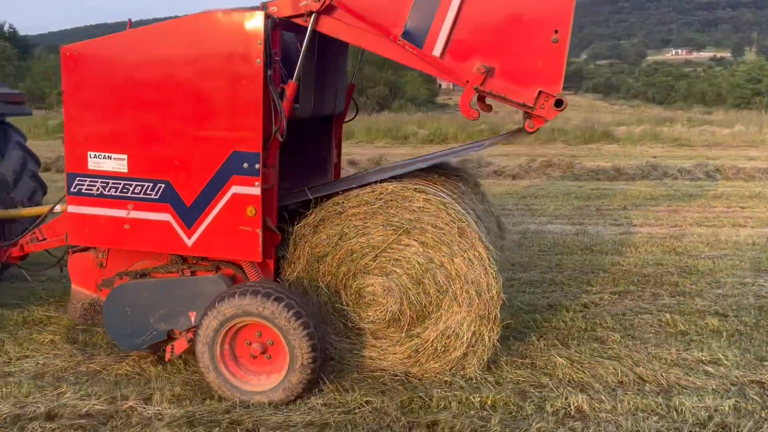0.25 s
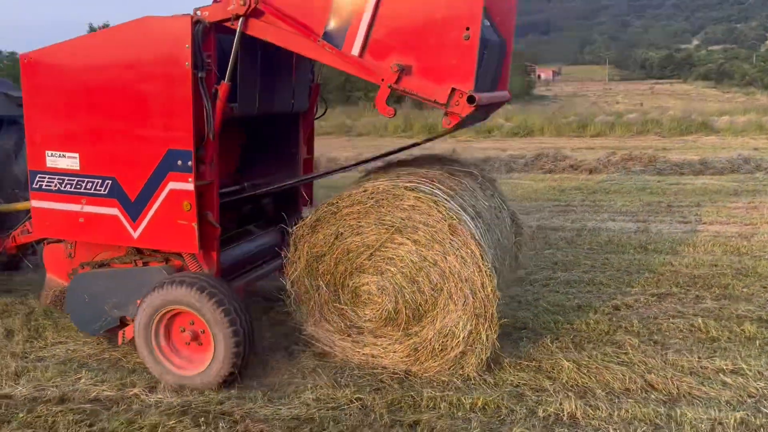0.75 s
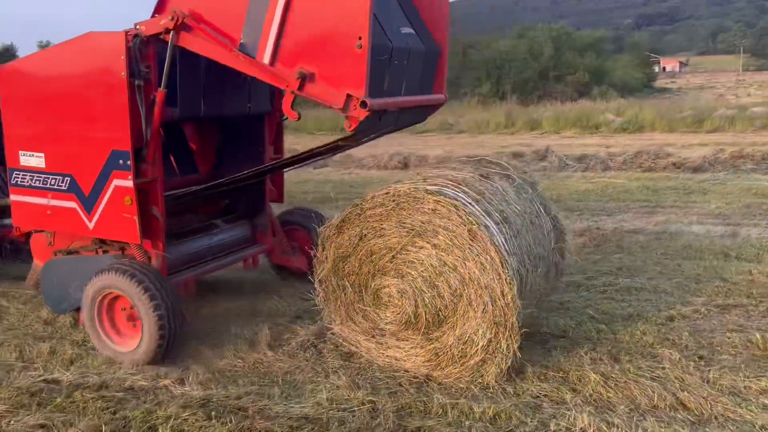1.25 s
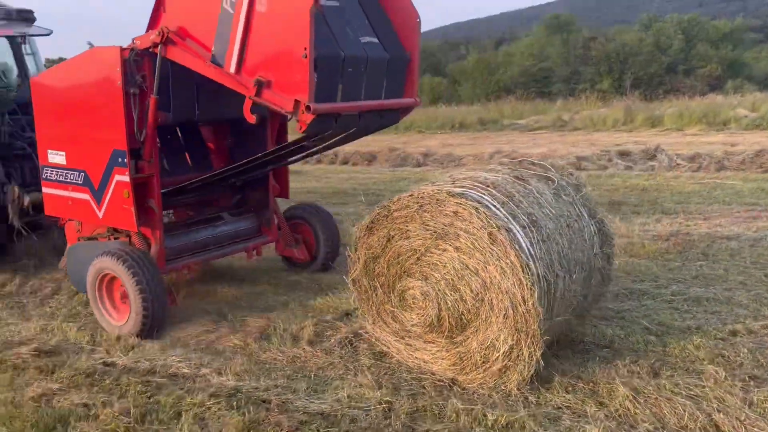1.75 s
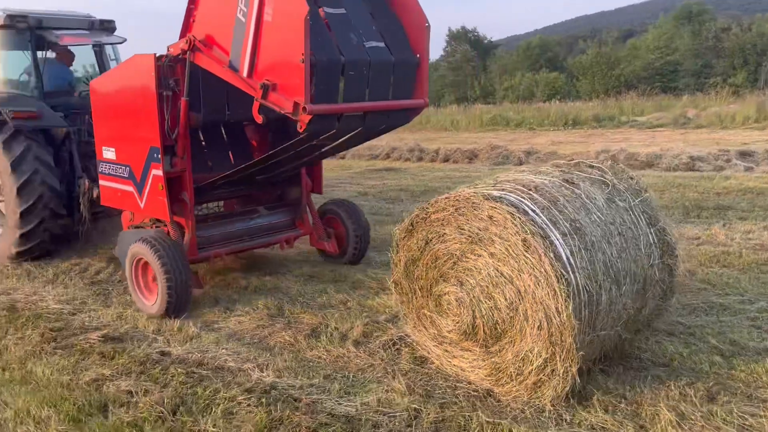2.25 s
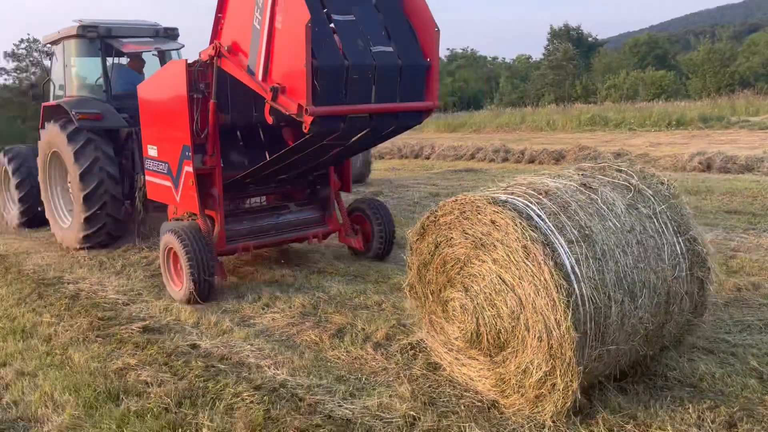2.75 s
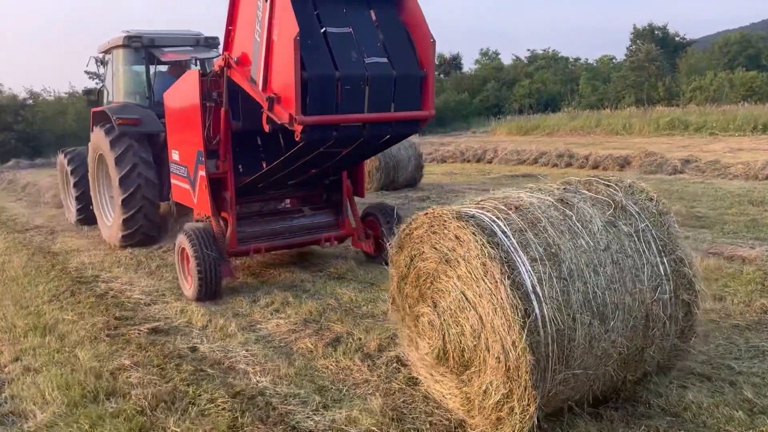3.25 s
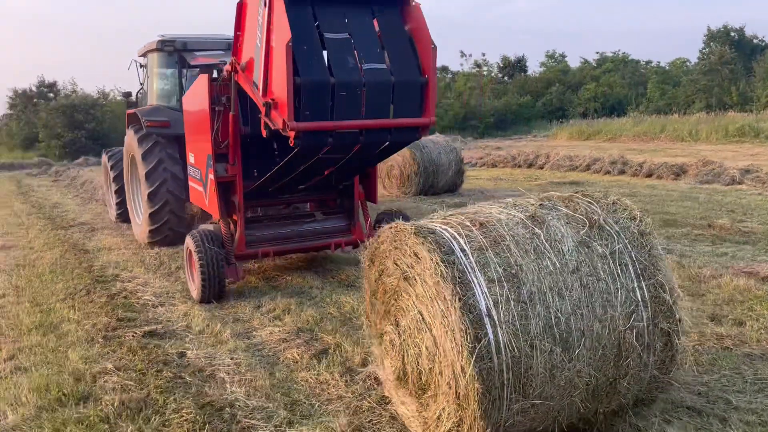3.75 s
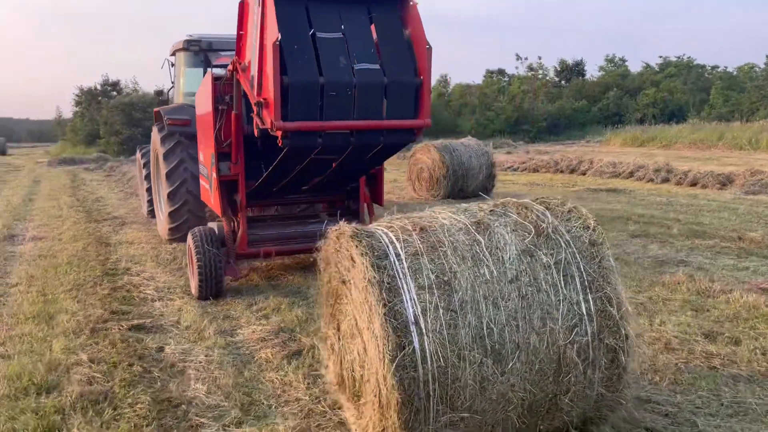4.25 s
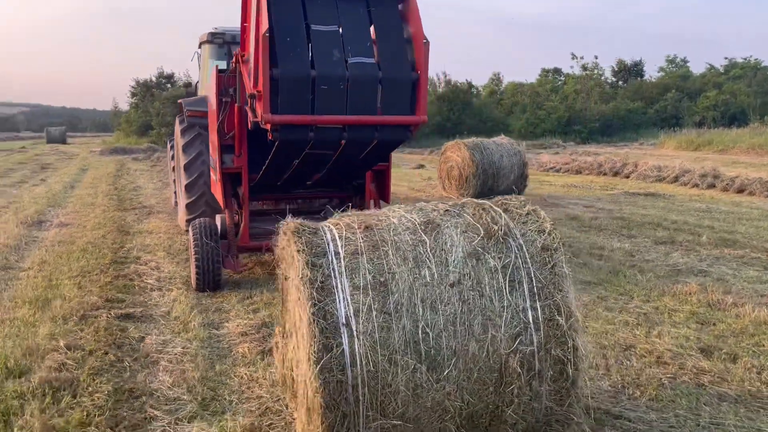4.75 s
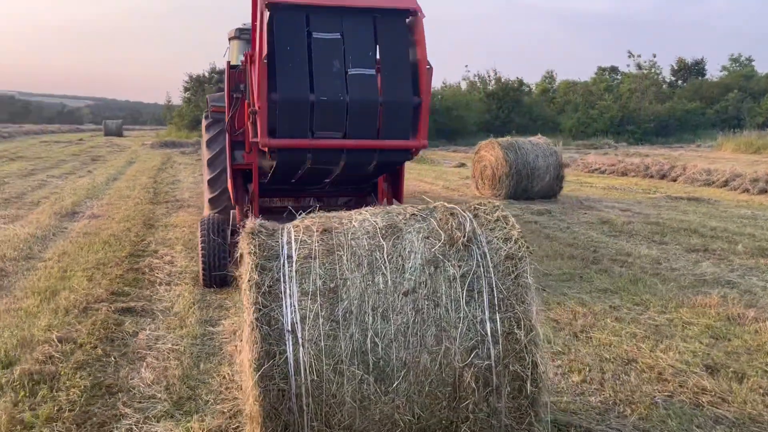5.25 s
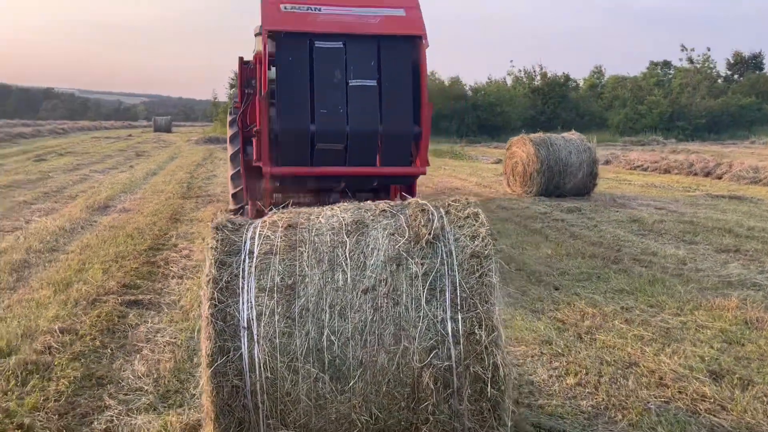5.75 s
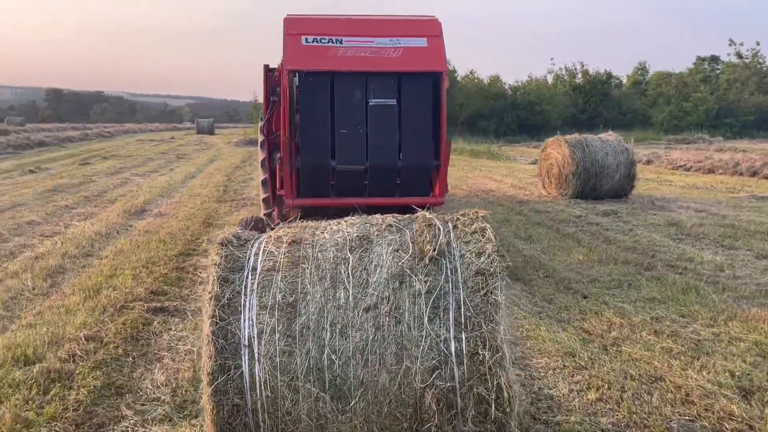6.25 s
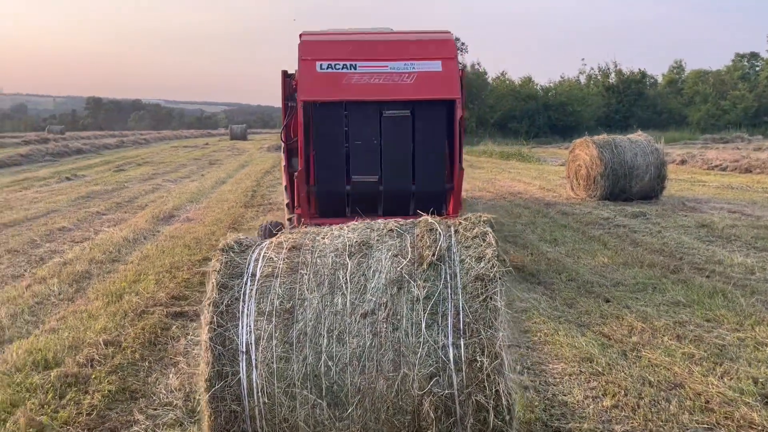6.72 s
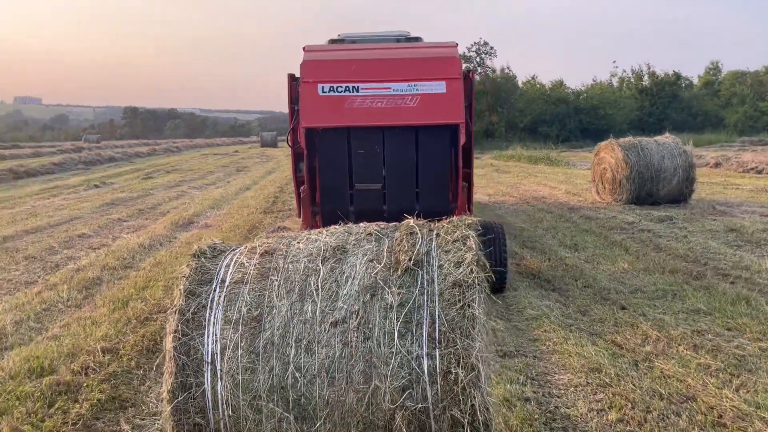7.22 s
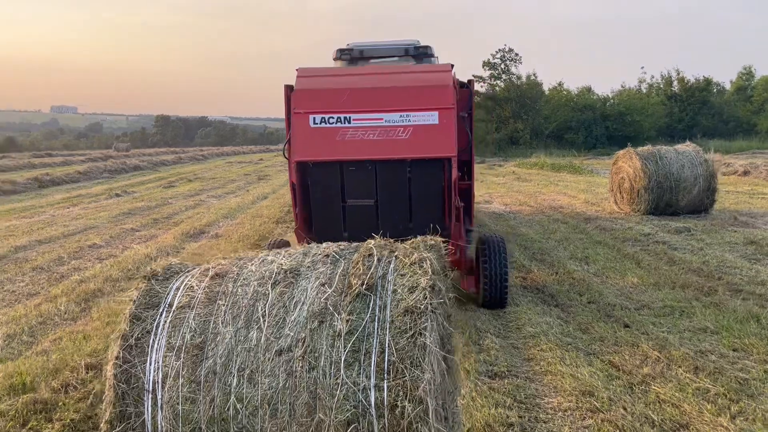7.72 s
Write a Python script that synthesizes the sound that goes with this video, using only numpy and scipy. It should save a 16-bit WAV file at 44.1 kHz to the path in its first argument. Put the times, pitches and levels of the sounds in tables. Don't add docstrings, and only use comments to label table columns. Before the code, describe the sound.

In an open mown field, a close diesel tractor and round baler rattle loudly. The engine sags under load, barking, then recovers within about a second and settles to an even hum. Pump and gear whine continue as the machine gets quieter. A dry bearing chirps repeatedly, a hinge squeals briefly, and dull steel knocks sound far off. Faint crickets appear late, while wind buffets the handheld stereo phone.

```python
import sys
import numpy as np
from scipy import signal
from scipy.fft import rfft, irfft, next_fast_len
from scipy.io import wavfile
from scipy.ndimage import uniform_filter1d, map_coordinates

SR = 44100
rng = np.random.default_rng(int(sys.argv[2]) if len(sys.argv) > 2 else 0)


def store_wav(level_fs):
    pcm = np.round(np.clip(np.atleast_2d(level_fs), -1, 1) * 32767)
    wavfile.write(sys.argv[1], SR, pcm.T.astype(np.int16))


def linear_from_db(decibels):
    return 10 ** (np.asarray(decibels, float) / 20)


N = 351907

# time_s, tooth_rate_hz
SPEED = [(0, 409.6), (.15, 413), (.26, 402.4), (.49, 357.6), (.62, 339.4), (.8, 334.4), (1.0, 361),
         (1.13, 400), (1.24, 408.4), (1.5, 417.8), (2.0, 415.1), (7.98, 415.9)]
GOVERNED_HZ, BOGGED_HZ = 416, 334
FIRING, FAN = .197, .4925
# time_s, level_db
AWAY = [(0, 0.5), (.5, 0.5), (.95, 0), (1.5, -3), (2.2, -6), (2.9, -7), (3.4, -6.5), (4.8, -8),
        (5.25, -9.5), (5.6, -12), (6.5, -12), (7.2, -13), (7.98, -11)]

# middle_s, half_length_s, level_db
FIRING_LOBES = [(.1, .2, -39.5), (.45, .14, -34), (.68, .14, -32.5), (.88, 0.087, -31.5), (1.2, 0.13, -35),
                (4.3, 2.6, -50)]
# middle_s, half_length_s, level_db
DOUBLE_LOBES = [(.05, 0.21, -31), (.5, 0.2, -37), (.9, 0.23, -40.5), (3.2, 0.22, -49), (6.2, 0.52, -37.5),
                (7.9, 0.21, -28.5)]
FIRING_DB, LUG_DB = -42.5, 6.5
BARK_DB, BARK_SLOPE_DB, BARK_SCATTER_DB = -53, 3, 5
# middle_s, half_length_s, level_db
FAN_LOBES = [(0, 0.32, -35), (1.8, 0.71, -37), (4.1, 1.41, -36), (5.85, 0.65, -33.5), (7.3, 1.38, -32.5)]
# middle_s, half_length_s, level_db
FAN_THIRD_LOBES = [(.6, 1.4, -49), (2.05, 0.32, -56.5), (4.1, 1.4, -55.5), (5.3, 0.97, -55),
                   (7, 1.6, -57.5)]
# middle_s, half_length_s, level_db
PUMP_LOBES = [
    [(0, 0.21, -51), (1.75, 0.74, -45), (3.4, 1.14, -43), (4.8, 0.26, -57.5), (6.4, 0.81, -49),
     (7.5, 0.8, -49.5)],
    [(.12, 0.42, -41), (1.02, 0.087, -46), (1.6, 0.36, -55.5), (2.7, .8, -47.5), (3.85, 0.65, -46),
     (4.95, 0.43, -49.5), (6.8, 0.28, -58), (7.6, 0.17, -56)],
    [(.38, 0.19, -39.5), (1.04, 0.29, -42.5), (1.63, 0.23, -42.5), (2.9, 0.72, -54), (4.2, 0.43, -52),
     (6.3, 1.74, -55)],
    [(.5, 0.17, -41), (1.02, .15, -43), (2.1, 0.47, -47.5), (2.92, 0.12, -49.5), (3.6, 0.28, -50.5),
     (4.05, .2, -50)],
]
PUMP_SHAKE_DB, PUMP_DRIFT = 1, .015
# multiple_of_tooth_rate, level_db
GEARS = [(.6235, -47), (.6575, -49), (.6885, -56)]
# time_s, level_db
GEARS_IN = [(0, -24), (3.5, -10.5), (4.8, 2), (6.5, 5.5), (7.5, -1.5), (7.98, 10.5)]
GEAR_SHAKE_DB, GEAR_DRIFT = 1.5, .04
# multiple_of_tooth_rate, level_db
MESH = [(2.355, -0.5), (2.912, 3), (3.146, 6.5), (3.34, 0.5)]
# multiple_of_tooth_rate, then swells of middle_s, half_length_s, level_db
MESH_LOBES = [
    (2.56, [(.07, 0.11, -42.5), (.27, .05, -42), (1.9, 0.75, -50.5), (6.5, 4.3, -62)]),
    (3.828, [(.28, 0.13, -40.5), (.58, 0.067, -36.5), (.78, 0.02498, -38), (1.95, 0.17, -52), (3, 0.7, -61), (6.8, 1, -61.5)]),
    (4.998, [(.7, 0.19, -45), (1.45, 0.18, -64), (2.15, 0.15, -58.5), (3.6, 0.21, -71), (6.8, 0.99, -68.5)]),
]

# frequency_hz, level_db
BODY = [(120, -35.5), (200, 3), (350, -0.5), (600, -3.5), (1000, -0.5), (1650, -3), (1800, -15),
        (2300, -23.5), (5000, -120)]
# frequency_hz, level_db
RATTLE = [(500, -120), (1400, -32), (1800, 5.5), (2200, -1.5), (2600, -1.5), (3100, -4), (3600, -4),
          (4700, -3), (5200, -5.5), (6000, -22), (12000, -120)]
# frequency_hz, level_db
HISS = [(1500, -120), (4400, -16), (5150, .5), (6400, -1.5), (7200, -1), (8500, .5), (10000, -3.5),
        (11300, -3), (12000, -13)]
# pitch_hz, width_hz, level_db
PANELS = [(2440, 59, 6), (3060, 270, 3.5), (4460, 31, 7.5), (5550, 92, 4), (5410, 770, -5.5),
          (1763, 99, -8.5), (3550, 340, -1.5)]
BODY_DB, RATTLE_DB, HISS_DB = -35.5, -45.5, -51.5
BASS_HZ, BASS_STAYS = 680, 0.46
RATTLE_FADES, HISS_FADES, WHINE_FADES = 1.276, 1.106, 0.83
SHADE_S, SHADE_HALF_S, SHADE_DB = 3.86, 2.7, -5
# pitch_hz, near_level_db, flare_middle_s, flare_half_length_s, flare_level_db
WHINES = [(2426, -64, 2, .3, -68), (3053, -67, 3.3, .9, -70), (4928, -69, 3.6, .25, -69),
          (5817, -79, 3.15, .6, -75), (4538, -70, 3.9, .5, -74), (3741, -72, 2.5, .4, -75),
          (2455, -99, 7.9, .16, -65)]

# peak_s, level_db
CHIRPS = [ (3.669, -63), (3.755, -58), (3.848, -45), (3.96, -52), (4.064, -57), (4.18, -49), (4.278, -51),
          (4.382, -48), (4.485, -46.5), (4.585, -45.5), (4.693, -45), (4.793, -45.5), (4.906, -52),
          (5.014, -51), (5.117, -52), (5.222, -48), (5.326, -47), (5.44, -48), (5.56, -50), (5.678, -56),
          (5.785, -56)]
# middle_s, half_length_s, level_db
DRAG = [
    (3.72, .14, -61),
    (4.6, .4, -72),
    (5.4, .45, -71),
]
CHIRP_HZ, FALL_HZ, RISE_S, CHIRP_S = 2428, 22, .015, .015
# start_s, length_s, level_db
SQUEAL = [
    (5.142, 0.062, -46.5),
    (5.195, 0.058, -46),
    (5.243, .04, -53),
    (5.288, 0.04, -48),
    (5.318, .035, -51.5),
    (5.36, 0.045, -59),
]
# middle_s, half_length_s, level_db
OVERTONES = [
    [(5.157, .012, -63), (5.186, 0.015, -53), (5.24, .04, -67), (5.322, 0.01, -56), (5.345, .015, -61),
     (5.39, 0.025, -64)],
    [(5.19, 0.03, -69), (5.25, .016, -63)],
]
SQUEAL_HZ, SAG_HZ_PER_S, SLIP_EDGE_S = 1921, 500, 0.012
# start_s, peak_db
CLANK = [
    (5.9124, -42),
    (6.85, -51),
    (7.187, -43),
]
# frequency_hz, level_db
CLANK_COLOUR = [(300, -22), (1200, 8.0), (4400, -11.5), (12000, -21)]

# start_s, level_db
CRICKET = [
    (6.29, -64),
    (6.975, -61),
    (7.13, -66),
    (7.317, -58),
    (7.652, -57),
    (7.8, -64),
]
STROKES_DB = [-7, -3.5, -.5, .5]
# time_s, level_db
WIND = [(0, -49), (.35, -40.5), (1.7, -36), (2.6, -37), (3.6, -30), (4.4, -32.5), (5.1, -31), (5.9, -34.5),
        (6.8, -29.5), (7.55, -24.5), (7.77, -27), (7.82, -32), (7.98, -37)]
# middle_s, half_length_s, low_thump_db, high_thump_db
GUSTS = [(0, 0.023, -47, -42), (0.477, 0.029, -49, -35.5), (1.35, 0.031, -44, -41), (2.31, 0.029, -29, -49),
         (2.41, 0.046, -33, -42), (2.55, 0.029, -30, -41), (3.41, 0.02, -30, -31), (3.72, 0.11, -29.5, -47),
         (5.047, 0.021, -26, -30), (5.36, 0.038, -32, -45), (5.81, .03, -32, -40), (6.653, 0.033, -32, -34),
         (6.86, 0.047, -27, -37), (7.197, .03, -31, -30), (7.55, 0.052, -36, -32),
         (1.851, 0.073, -30.5, -47), (2.093, 0.039, -30, -28), (2.2, 0.053, -32, -36),
         (2.671, 0.034, -31, -28.5), (2.812, 0.071, -35, -31.5), (2.947, 0.08, -26, -30.5),
         (3.088, 0.043, -26.5, -31), (3.127, 0.029, -23, -30), (3.201, 0.025, -23, -29),
         (3.378, 0.048, -33, -30.5), (3.889, 0.048, -22.5, -35), (4.269, 0.029, -31, -26),
         (4.447, 0.14, -30.5, -44), (4.581, 0.044, -25, -45), (4.709, 0.03, -22, -23.5),
         (4.863, 0.093, -28, -33), (5.277, 0.023, -23, -49), (5.56, 0.13, -26.5, -35),
         (5.724, 0.023, -23, -40), (5.937, 0.08, -24, -45), (6.131, 0.06, -26, -34.5),
         (6.269, 0.03, -20.5, -27.5), (6.342, 0.0051, -20, -19.5), (6.427, 0.039, -20, -25),
         (6.531, 0.042, -23, -32), (7.025, 0.055, -29.5, -27.5), (7.293, 0.061, -19.5, -23.5),
         (7.428, 0.012, -15, -21.5), (7.731, 0.059, -25.5, -21)]
# frequency_hz, level_db
GUST_LOW = [(12, -58.5), (28, 14.5), (45, 18.5), (70, 29.5), (100, 26.5), (130, 19), (190, -29), (400, -58),
            (1000, -120)]
# frequency_hz, level_db
GUST_HIGH = [(40, -74.5), (85, -21.5), (125, 2), (160, 1.5), (220, -7), (300, -13.5), (420, -27.5),
             (600, -35.5), (1000, -67.5), (3000, -120)]
HIGH_OVER_LOW_DB = -2.5

# frequency_hz, phase_radians
LEAD = [(100, 0), (450, .55), (700, 1.2), (1000, 2.1), (1400, 2.8), (1650, 3), (1750, 1.6), (1950, .8),
        (2250, 0), (2900, 1.3), (3400, .3), (4600, 1.1), (5400, .1), (6300, 0), (7400, -3.14),
        (9700, -3.14), (10500, -6.28)]
# frequency_hz, phase_radians
LEAD_AHEAD = [(100, 0), (450, -.4), (750, 0), (1300, 0), (1600, .6), (1800, 0), (2600, .2), (3200, .5),
              (4000, .2), (4800, .3), (5700, -.8), (6400, -.6), (7300, -3.14), (9700, -3.14),
              (10400, -6.28)]
# frequency_hz, level_db
TILT = [(300, .3), (950, 1.5), (1150, 1), (1500, -6.5), (1650, -4), (1830, 5), (2000, 4), (2300, .5),
        (3050, 5), (3900, 3.5), (4850, 5.5), (5400, 1), (6700, -.5), (7500, 0)]
# frequency_hz, likeness_0_to_1
ALIKE = [(100, .9), (450, .97), (800, .85), (1500, .85), (1780, .5), (1950, .4), (2250, .94), (3000, .65),
         (4900, .55), (5500, .88), (6400, .95), (7000, .5), (7450, .9), (8000, .996), (9100, .996),
         (9650, .9), (10000, .5), (10450, .9), (11000, .998)]
# frequency_hz, likeness_0_to_1
ALIKE_AHEAD = [(100, .82), (450, .93), (1800, .9), (2250, .85), (3000, .6), (4900, .5), (5500, .6),
               (6400, .75), (7000, .5), (7450, .9), (8000, .99), (9100, .99), (10000, .5), (11000, .98)]
# time_s, share_ahead_0_to_1
TURN = [(0, 0.068), (1.5, 0.26), (4, 0.57), (5.5, 0.6), (7.98, 0.8)]
TOP_HZ = 11930


def unit(x):
    return x / np.sqrt(np.mean(x ** 2) + 1e-20)


def along(points, hz):
    f, v = np.transpose(points)
    return np.interp(np.log(hz + 1), np.log(f + 1), v)


def curves(rows):
    s, *cols = np.transpose(rows)
    return [np.interp(np.arange(N) / SR, s, c) for c in cols]


def lobes(rows):
    s = np.arange(0, N + 64, 64) / SR
    power = np.zeros(len(s))
    for middle, half, db in rows:
        far = ((s - middle) / half) ** 2
        power += linear_from_db(db) ** 2 * np.exp(-far * (1 + far))
    return np.interp(np.arange(N) / SR, s, 10 * np.log10(power + 1e-12))


def wobble(rate):
    s = np.arange(0, N + 128, 64)
    knots = map_coordinates(rng.standard_normal(int(N * rate / SR) + 4), [s * rate / SR])
    between = np.diff(knots)[:, None] * (np.arange(64) / 64)
    return (knots[:-1, None] + between).ravel()[:N]


def filtered(x, response):
    m = next_fast_len(N + 8192)
    return irfft(rfft(x, m) * response(np.fft.rfftfreq(m, 1 / SR)), m)[..., :N]


def rush(gain_db, patchy_db, gate=1):
    z = signal.stft(rng.standard_normal((2, N)), nperseg=512)[2]
    field = uniform_filter1d(rng.standard_normal(z.shape[1:]), 6, 0)
    field = unit(uniform_filter1d(field, 12, 1))
    pair = gate * signal.istft(z * linear_from_db(patchy_db * field), nperseg=512)[1][:, :N]
    return unit(filtered(pair, lambda hz: linear_from_db(gain_db(hz))))


def tone(turns, db, shake_db, drift):
    cycle = ((turns + drift * wobble(6)) % 1).astype(np.float32)
    level = linear_from_db((db + shake_db * wobble(9)).astype(np.float32))
    return np.sqrt(2) * level * np.sin(np.float32(2 * np.pi) * cycle)


def engine():
    tooth_hz = curves(SPEED)[0]
    load = np.clip((GOVERNED_HZ - tooth_hz) / (GOVERNED_HZ - BOGGED_HZ), 0, 1)
    return np.cumsum(tooth_hz) / SR, load


def firing_tones(teeth, load):
    out = tone(FIRING * teeth, lobes(FIRING_LOBES), PUMP_SHAKE_DB, PUMP_DRIFT)
    out += tone(2 * FIRING * teeth, lobes(DOUBLE_LOBES), shake_db=2.5, drift=0.017)
    load_db = FIRING_DB + LUG_DB * load + curves(AWAY)[0]
    for k in range(3, 7):
        out += tone(k * FIRING * teeth, 2 * load_db + 17.0 - 2.1 * k, shake_db=4.5, drift=0.03)
    return out


def bark(teeth, load):
    n = 2 * SR
    firings = FIRING * teeth[:n] + .01 * wobble(50)[:n]
    ladder = np.zeros(n)
    for k in range(7, 19):
        db = BARK_DB - BARK_SLOPE_DB * k + BARK_SCATTER_DB * wobble(4.4)[:n]
        ladder += linear_from_db(db) * np.sin(2 * np.pi * (k * firings + rng.random()))
    return np.pad(np.sqrt(load[:n]) * ladder, (0, N - n))


def fan_tones(teeth):
    out = tone(FAN * teeth, lobes(FAN_LOBES), shake_db=0.5, drift=0.074)
    return out + tone(3 * FAN * teeth, lobes(FAN_THIRD_LOBES), shake_db=2.0, drift=0.025)


def pump_and_gears(teeth, load):
    slap = .12 * np.sqrt(load) * wobble(70)
    gears_in_db, away_db = curves(GEARS_IN)[0], curves(AWAY)[0]
    out = np.zeros(N)
    for k, rows in enumerate(PUMP_LOBES):
        turns = (k + 1) * teeth + k / 3 * slap
        out += tone(turns, lobes(rows), PUMP_SHAKE_DB, PUMP_DRIFT * (k + 1))
    for order, db in GEARS:
        out += tone(order * teeth, db + gears_in_db, GEAR_SHAKE_DB, GEAR_DRIFT)
    for order, rows in MESH_LOBES:
        out += tone(order * teeth + slap, lobes(rows), shake_db=1.5, drift=0.12)
    for order, db in MESH:
        out += tone(order * teeth, db - 59.0 + 0.81 * away_db, shake_db=2.5, drift=0.26)
    return out


def machinery(teeth):
    s, away_db = np.arange(N) / SR, curves(AWAY)[0]
    firings = FIRING * teeth
    strength = linear_from_db(rng.normal(0, 7.2, int(firings[-1]) + 1))
    knock = strength[firings.astype(int)] * np.exp(-4 * (firings % 1))

    def panels(hz):
        return sum(db / (1 + (2 * (hz - c) / w) ** 2) for c, w, db in PANELS)

    body = rush(lambda hz: along(BODY, hz), patchy_db=1.0, gate=1 + 0.16 * knock)
    rattle = rush(lambda hz: along(RATTLE, hz) + panels(hz), patchy_db=1.1, gate=1 + 0.15 * knock)
    hiss = rush(lambda hz: along(HISS, hz) + panels(hz), patchy_db=2.0, gate=1 + 0.28 * knock)
    shade = linear_from_db(SHADE_DB * np.exp(-((s - SHADE_S) / SHADE_HALF_S) ** 2))
    hiss = hiss + (shade - 1) * filtered(hiss, lambda hz: hz > 8500)
    bass = filtered(body, lambda hz: 1 / (1 + (hz / BASS_HZ) ** 4))
    body = body + (linear_from_db(-BASS_STAYS * away_db) - 1) * bass
    shake_db = 0.18 * wobble(18)
    out = linear_from_db(BODY_DB + away_db) * body
    out += linear_from_db(RATTLE_DB + RATTLE_FADES * away_db + shake_db) * rattle
    return out + linear_from_db(HISS_DB + HISS_FADES * away_db + 5.2 * shake_db) * hiss


def whines():
    s, away_db = np.arange(N) / SR, WHINE_FADES * curves(AWAY)[0]
    out = np.zeros(N)
    for hz, near_db, *flare in WHINES:
        db = np.maximum(near_db + away_db, lobes([flare]))
        out += tone(hz * s + .09 * wobble(150), db, shake_db=2.5, drift=.25)
    return out


def bearing():
    out, t = np.zeros(N), np.arange(-SR // 30, SR // 12) / SR
    shape = np.exp(-(t / np.where(t < 0, RISE_S, CHIRP_S)) ** 2)
    for (s, db), off in zip(CHIRPS, rng.standard_normal(len(CHIRPS))):
        hz = CHIRP_HZ + 12 * off - FALL_HZ * np.tanh(t / CHIRP_S)
        ring = np.sin(2 * np.pi * np.cumsum(hz) / SR)
        out[round((s + t[0]) * SR):][:len(t)] += linear_from_db(db) * shape * ring
    steady = np.sin(2 * np.pi * (CHIRP_HZ - FALL_HZ / 2) * np.arange(N) / SR)
    drag = np.sqrt(2) * linear_from_db(lobes(DRAG)) * steady
    return (out + drag) * linear_from_db(1.1 * wobble(82))


def hinge():
    s = np.arange(N) / SR
    hz = SQUEAL_HZ - SAG_HZ_PER_S * np.clip(s - 5.335, 0, .1)
    turns = np.cumsum(hz) / SR + 0.06 * wobble(64)
    slips = np.zeros(N)
    for start, length, db in SQUEAL:
        to_edge = np.minimum(s - start, start + length - s)
        slips += np.clip(to_edge / SLIP_EDGE_S, 0, 1) * linear_from_db(db)
    out = slips * linear_from_db(1.3 * wobble(60)) * np.sin(2 * np.pi * turns)
    for harmonic, rows in enumerate(OVERTONES, 2):
        out += linear_from_db(lobes(rows) + 2.6 * wobble(80)) * np.sin(2 * np.pi * harmonic * turns)
    return np.sqrt(2) * out


def clanks():
    out, t = np.zeros(N), np.arange(SR // 10) / SR
    for s, db in CLANK:
        fade = linear_from_db(db + 3.0 - 60 * t / 0.14) * (1 - np.exp(-t / .002))
        ring = rng.standard_normal(len(t)) + 1.4 * np.sin(2 * np.pi * 600 * t)
        out[round(s * SR):][:len(t)] += fade * ring
    return filtered(out, lambda hz: linear_from_db(along(CLANK_COLOUR, hz)))


def crickets():
    out, t = np.zeros(N + SR), np.arange(SR // 45) / SR
    hz = 5000 - 550 * (t / t[-1]) ** 2
    stroke = np.sin(np.pi * t / t[-1]) * np.sin(2 * np.pi * np.cumsum(hz) / SR)
    for s, db in CRICKET:
        for k, grow_db in enumerate(STROKES_DB):
            out[round((s + .03 * k) * SR):][:len(t)] += linear_from_db(db + grow_db) * stroke
    return out[:N]


def wind():
    breeze = linear_from_db(curves(WIND)[0])
    low_thumps = linear_from_db(lobes([(s, half, db) for s, half, db, _ in GUSTS]))
    high_thumps = linear_from_db(lobes([(s, half, db) for s, half, _, db in GUSTS]))

    def even(x):
        return x / np.sqrt(1.0 + np.abs(uniform_filter1d(x[0] ** 2, size=2200)))

    low = unit(even(rush(lambda hz: along(GUST_LOW, hz), patchy_db=0.5)))
    high = unit(even(rush(lambda hz: along(GUST_HIGH, hz), patchy_db=0.75)))
    low = np.hypot(breeze, low_thumps) * low
    high = np.hypot(breeze * linear_from_db(HIGH_OVER_LOW_DB), high_thumps) * high
    mid, side = low + high * linear_from_db([[0], [4]])
    return np.array([mid + .31 * side, mid - .3 * side])


def ports(direct, scattered, lead, alike):
    sign = np.array([[.5], [-.5]])

    def turn(hz):
        return np.arccos(along(alike, hz)) / 2

    def body(hz):
        return linear_from_db(sign * along(TILT, hz)) * np.exp(1j * sign * along(lead, hz))

    same = filtered(direct, lambda hz: body(hz) * np.cos(turn(hz)))
    return same + filtered(scattered, lambda hz: 2 * sign * body(hz) * np.sin(turn(hz)))


def scene():
    teeth, load = engine()
    direct, scattered = machinery(teeth)
    tones = firing_tones(teeth, load) + bark(teeth, load) + fan_tones(teeth) + pump_and_gears(teeth, load)
    tones += whines() + bearing() + hinge() + clanks() + crickets()
    echo = np.roll(tones, 190)
    direct, scattered = direct + tones, scattered + 0.1 * echo
    ahead = np.clip(curves(TURN)[0], 0, 1)
    from_left = ports(direct, scattered, LEAD, ALIKE)
    from_ahead = ports(direct, scattered, LEAD_AHEAD, ALIKE_AHEAD)
    return (1 - ahead) * from_left + ahead * from_ahead + wind()


def low_pass(x):
    return signal.sosfilt(signal.butter(12, 12520, fs=SR, output="sos"), x)


def record(dry):
    fade = np.clip(np.arange(N)[::-1] / (.006 * SR), 0, 1)
    mix = filtered(dry * fade, lambda hz: hz < TOP_HZ)
    return low_pass(mix)


dry = scene()
out = record(dry)
store_wav(out)
```